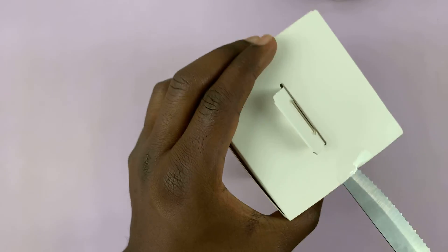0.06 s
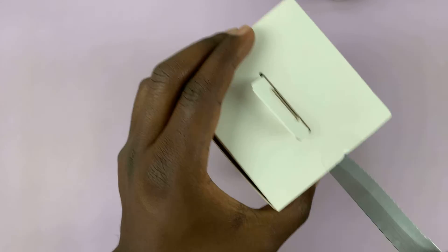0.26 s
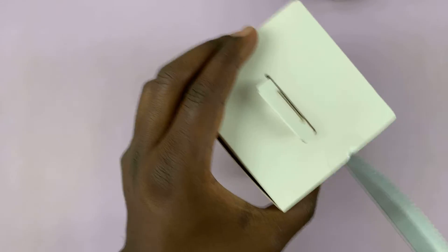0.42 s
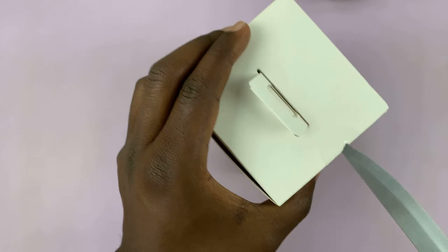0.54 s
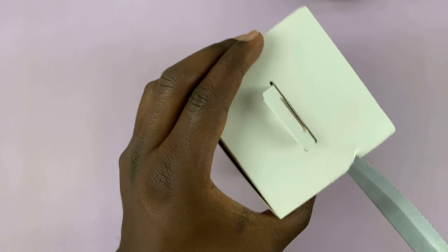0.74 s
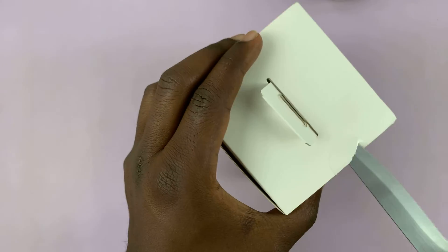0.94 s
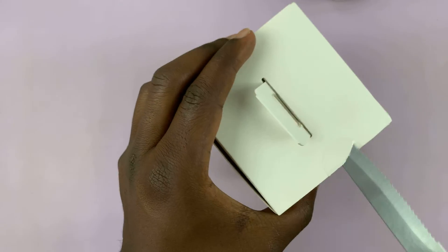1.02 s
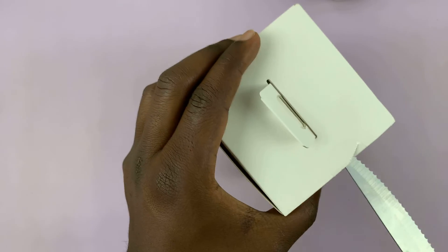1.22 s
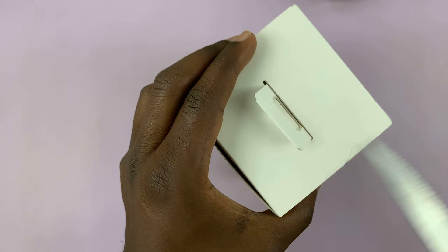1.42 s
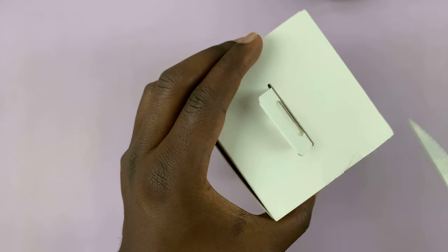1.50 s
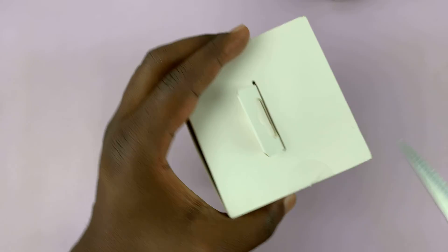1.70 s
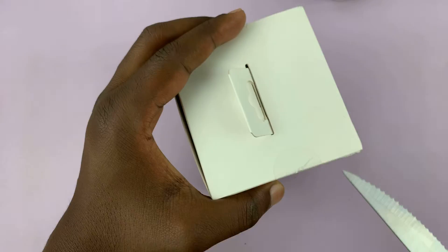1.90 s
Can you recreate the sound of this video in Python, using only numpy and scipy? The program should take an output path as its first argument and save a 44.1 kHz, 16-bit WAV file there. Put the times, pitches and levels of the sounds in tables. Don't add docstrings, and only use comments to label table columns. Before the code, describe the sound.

A serrated knife saws at a seal on a small hollow cardboard box, close to a phone indoors. Light scratches and a small jolt at 0.2 s lead to strong rasping cuts at 0.42-0.54 and 0.6-0.72 s, with crackling fibres, hollow knocks and low table booms. A sharp cut comes near 1.0 s, weaker scrapes at 1.1 and 1.4-1.55 s, then quiet hum and faint bird whistles.

```python
import sys
import numpy as np
from scipy import signal
from scipy.fft import rfft, irfft
from scipy.io import wavfile
from scipy.ndimage import uniform_filter1d

SR = 44100
rng = np.random.default_rng(int(sys.argv[2]) if len(sys.argv) > 2 else 0)


def gain_from_db(level_db):
    decades = np.asarray(level_db, float) / 20
    return 10 ** decades


def generate_wav(signal):
    frames = np.transpose(np.atleast_2d(signal))
    scaled = np.clip(frames, -1, 1) * 32767
    pcm = np.round(scaled).astype(np.int16)
    wavfile.write(sys.argv[1], SR, pcm)


N = 85995


def unit(x):
    return x / np.sqrt(np.mean(x ** 2))


def ring(x, hz, width_hz):
    return signal.lfilter(*signal.iirpeak(hz, hz / width_hz, SR), x)


def body(x, modes):
    total = np.zeros(len(x))
    for k, (hz, width_hz, db) in enumerate(modes):
        total += (-1) ** k * gain_from_db(db) * ring(x, hz, width_hz)
    return total


def colour(x, points):
    f = np.maximum(np.fft.rfftfreq(N, 1 / SR), 1)
    hz, db = np.array(points).T
    below_db = 24 * np.minimum(np.log2(f / hz[0]), 0)
    curve_db = np.interp(np.log(f), np.log(hz), db)
    return irfft(rfft(x) * gain_from_db(curve_db + below_db), N)


def walk(rate_hz):
    hold = max(int(SR / rate_hz), 1)
    steps = np.repeat(rng.standard_normal(N // hold + 1), hold)
    smooth = uniform_filter1d(uniform_filter1d(steps, hold), hold)[:N]
    return smooth / np.std(smooth)


def gate(t, start, length, attack, release):
    rise = np.sin(np.pi / 2 * np.clip((t - start) / max(attack, 1 / SR), 0, 1)) ** 2
    return rise * np.exp(-np.maximum(t - start - length, 0) / release)


def add(out, start, x):
    i = max(int(start * SR), 0)
    out[i:i + len(x)] += x[:N - i]


# f/Hz, level/dB per Hz
ROOM_TONE = [(40, 4), (80, -1.5), (160, -0.5), (300, -11), (700, -20.5), (1500, -23.5), (4000, -31.5),
             (15500, -35)]


def room():
    air = gain_from_db(-63.5 + 0.46 * walk(0.59)) * unit(colour(rng.standard_normal(N), ROOM_TONE))
    hum_level = np.sqrt(2) * gain_from_db(-65.5 + 4.3 * walk(8.54))
    hum_hz = 116.5 + 1.4 * walk(5.92)
    hum = hum_level * np.sin(2 * np.pi * np.cumsum(hum_hz) / SR)
    rumble = gain_from_db(-70) * unit(ring(rng.standard_normal(N), 58, 7.2))
    return air + hum + rumble


# t/s, length/s, f/Hz, level/dB
WHISTLES = [
    (.8, .1, 1630, -81),
    (1.1, .07, 1480, -78),
    (1.19, .16, 1372, -79),
    (1.63, .04, 1480, -82),
    (1.72, .05, 1522, -77),
    (1.825, .075, 1500, -77),
]


def bird(t):
    sag_hz_per_s = 100
    out = np.zeros(N)
    for start, length, hz, db in WHISTLES:
        mean_hz = hz - sag_hz_per_s * (t - start - length) / 2
        whistle = np.sin(2 * np.pi * mean_hz * (t - start))
        out += np.sqrt(2) * gain_from_db(db) * gate(t, start, length, attack=.015, release=.012) * whistle
    return gain_from_db(1.5 * walk(30.2)) * out


# t/s, low boom level/dB, high boom level/dB
TABLE_KNOCKS = [(0, -52.5, -48), (0.059, -54, -51.5), (0.209, -45, -48), (0.341, -49.5, -55),
                (0.429, -40.5, -39), (0.492, -63, -43.5), (0.581, -49, -45), (0.642, -38, -40.5),
                (0.69, -37, -40), (0.782, -49.5, -43), (0.922, -59, -70), (.995, -40, -41),
                (1.091, -68, -47), (1.177, -46, -69), (1.402, -53, -69), (1.539, -49.5, -80)]


def table():
    table_hz, t60_s, rise_s = (50.96, 91.6), (0.71, 0.27), 0.0058
    out, u = np.zeros(N), np.arange(int(.5 * SR)) / SR
    for start, *levels_db in TABLE_KNOCKS:
        for db, hz, t60 in zip(levels_db, table_hz, t60_s):
            fade = gain_from_db(db - 1 - 60 * u / t60) * (1 - np.exp(-u / rise_s))
            add(out, start, fade * np.sin(2 * np.pi * hz * u))
    return out


# f/Hz, width/Hz, level/dB
BOX_MODES = [(159, 33, -3.5), (219, 33, 0), (257, 24, -3.5), (310, 23, 0.5), (360.2, 13, -1), (406, 9.2, 2),
             (501.3, 13.4, -4), (533.4, 37, -3), (602, 67, -13.5), (742, 28, -17), (826, 20.3, -8.5),
             (926, 4.4, -12), (1080, 6, -34), (1316, 11, -9.5)]
# t/s, peak level/dB, wall f/Hz
WALL_JOLTS = [(0.01, -43, 273), (.005, -46.5, 198), (0.019, -45, 330), (0.2106, -33.5, 263),
              (.216, -51, 293), (0.2234, -43, 237), (0.384, -48.5, 427), (0.4293, -35.5, 405),
              (.431, -34.5, 199), (.463, -35, 200), (0.4348, -29.5, 440), (0.4368, -26.5, 380),
              (0.4407, -30.5, 200), (0.4487, -47, 228), (.457, -32, 287), (0.4626, -32, 420),
              (.4685, -55, 437), (.4748, -28.5, 443), (.479, -26.5, 380), (.4918, -24, 440),
              (0.4994, -27, 360), (0.5031, -26, 438), (0.5092, -27, 363), (0.5143, -29.5, 340),
              (0.5237, -36, 362), (.646, -23.5, 322), (0.6547, -34, 384), (.664, -26.5, 310),
              (0.6702, -40, 300), (.6755, -27, 325), (.681, -29.5, 360), (0.6902, -41.5, 326),
              (0.6992, -37, 340), (0.7073, -47, 247), (0.7126, -35.5, 310), (.769, -45, 299),
              (0.949, -49.5, 303), (0.9993, -26.5, 310), (1.0112, -39, 325), (1.014, -41, 304),
              (1.02, -40.5, 277), (1.026, -41, 258), (1.133, -44, 209.8), (1.177, -48.5, 212),
              (1.406, -46, 292), (1.422, -49.5, 254), (1.476, -53, 332), (1.481, -39, 300),
              (1.4858, -43, 375), (1.5233, -38.5, 404), (1.529, -40, 324), (1.551, -51.5, 340)]


def jolts():
    rise_s, fall_s = .0018, .0028
    overtone, overtone_db = 1.444, -15
    out, u = np.zeros(N), np.arange(int(.04 * SR)) / SR - .008
    shape = np.where(u < 0, np.exp(-(u / rise_s) ** 2 / 2), np.exp(-u / fall_s))
    for peak_s, db, hz in WALL_JOLTS:
        swing = -np.cos(2 * np.pi * hz * u)
        swing -= gain_from_db(overtone_db) * np.cos(2 * np.pi * overtone * hz * u)
        add(out, peak_s + u[0], gain_from_db(db) * shape * swing)
    return out + gain_from_db(-10.5) * body(out, BOX_MODES)


# f/Hz, level/dB per Hz
CARD_SPECTRUM = [(410, -49), (700, -3.5), (850, -3), (1500, -6), (2080, -5.5), (3540, -10.5), (4030, -10.5),
                 (12800, -19), (15500, -24.5)]
# t/s, burst peak level/dB, ring f/Hz, ring peak level/dB
FIBRE_SNAPS = [(.015, -42, 3230, -50.5), (.1975, -54, 2080, -52), (.2065, -45, 3500, -54),
               (.2085, -36, 2370, -50), (.4255, -36, 3350, -45), (.432, -43, 8300, -55),
               (.438, -36, 1990, -32), (.446, -50, 2070, -34.5), (.4625, -26, 3430, -31),
               (.466, -57, 7360, -40), (.478, -29, 7230, -37), (.489, -58, 2950, -33.5),
               (.49, -43, 7040, -40), (.47, -47, 826, -24), (.501, -42, 4430, -41), (.597, -43, 4620, -56),
               (0.613, -50, 3360, -41), (.62, -40, 2050, -34), (.639, -34.5, 5280, -34),
               (.6405, -51, 3520, -40), (.643, -46, 2150, -32.5), (.658, -29.5, 2280, -39),
               (.6625, -27.5, 3800, -50), (.675, -29.5, 2250, -41), (.68, -47, 3510, -31),
               (.694, -39, 3300, -38.5), (.701, -41, 3460, -39), (.703, -35.5, 5260, -40.5),
               (.71, -42, 3400, -38), (.97, -43, 3280, -48), (.989, -40, 5000, -36.5),
               (.9935, -27.5, 3580, -30), (.9945, -47, 7600, -33.5), (.9942, -32, 9550, -35.5),
               (1.001, -36, 4300, -37), (1.01, -31.5, 4850, -37), (1.014, -27.5, 3670, -33),
               (1.0953, -35.5, 4670, -42), (1.133, -38.5, 3500, -44.5), (1.155, -39, 9600, -50.5),
               (1.187, -44, 1890, -49.5), (1.404, -38.5, 910, -47), (1.45, -42, 2010, -42),
               (1.4827, -32, 1655, -35.5), (1.483, -39, 1040, -37), (1.484, -36, 7340, -44),
               (1.516, -50, 4280, -48), (1.524, -35, 940, -51), (1.525, -62, 3500, -48)]


def cracks():
    burst_t60_s, ring_t60_s, rise_s = .026, .04, .003
    out, u = np.zeros(N), np.arange(int(.06 * SR)) / SR
    noise = colour(rng.standard_normal(N), CARD_SPECTRUM)
    for k, (start, db, hz, ring_db) in enumerate(FIBRE_SNAPS):
        piece = noise[k * len(u) // 2:][:len(u)]
        brighter = signal.lfilter([1, -0.4], 1, piece)
        burst = unit(brighter) * gain_from_db(db - 60 * u / burst_t60_s)
        width_hz = .16 * hz
        tone = ring(ring(piece[::-1], hz, width_hz), hz, width_hz)[::-1]
        tone = tone / np.std(tone[:len(u) // 6]) * gain_from_db(ring_db - 60 * u / ring_t60_s)
        add(out, start - rise_s / 2, .35 * (burst + tone) * np.minimum(u / rise_s, 1))
    return out


def patchy(x):
    octaves = np.log2(np.maximum(np.fft.rfftfreq(N, 1 / SR), 1) / 700)
    spectrum, out = rfft(x), np.zeros(N)
    for k in range(10):
        share = np.clip(1 - 2 * abs(np.clip(octaves, 0, 4.5) - k / 2), 0, 1)
        out += irfft(spectrum * share, N) * gain_from_db(2 * walk(150))
    return out


# f/Hz, width/Hz, level/dB
BLADE_MODES = [(846.6, 8.9, -31), (2104, 9.3, 3.5), (3560, 110, -23.5), (5470, 185, -6), (7230, 22, -19),
               (7090, 210, -5), (8600, 21, -67.5), (9930, 40, -8.5), (10100, 39, -35), (12300, 770, -12)]
# t/s, length/s, swell/s, scratch level/dB, box drumming level/dB
BLADE_STROKES = [(0, 0.069, 0.00063, -63, -61), (0.073, 0.05, 0.012, -67, -67), (.12, .07, .01, -72, -66),
                 (0.252, 0.094, .01, -73.5, -69), (0.781, 0.044, 0.011, -69, -67.5),
                 (.82, 0.11, .01, -75, -68.5), (1.168, 0.039, .01, -68, -70),
                 (1.212, 0.083, .01, -74.5, -70), (1.542, 0.071, .01, -73, -67),
                 (0.178, 0.026, 0.039, -53.5, -53.5), (0.209, 0.047, 0.01, -74, -58.5),
                 (0.315, 0.082, 0.058, -63, -58.5), (0.4214, 0.043, 0.0055, -48.5, -36.5),
                 (0.447, 0.047, 0.01, -44.5, -45), (0.496, 0.042, 0.0059, -55, -60),
                 (0.562, 0.07, 0.088, -48.5, -50.5), (.634, 0.047, 0.0035, -48.5, -47.5),
                 (0.692, 0.02, 0.0097, -51, -50.5), (0.718, 0.079, 0.022, -60.5, -63),
                 (0.876, 0.2, 0.1, -63, -62.5), (0.981, 0.031, 0.011, -53, -51.5),
                 (1.007, 0.042, 0.004, -63, -63), (1.097, 0.087, 0.0038, -60, -58),
                 (1.363, 0.072, 0.044, -61, -60), (1.441, 0.083, 0.013, -58.5, -54.5),
                 (1.473, 0.032, 0.002, -53.5, -55), (1.511, 0.042, 0.006, -64.5, -56.5),
                 (1.596, 0.073, 0.05, -69.5, -69)]


def stroke_force(t, column, release_s):
    power = np.zeros(N)
    for stroke in BLADE_STROKES:
        power += (gain_from_db(stroke[column]) * gate(t, *stroke[:3], release_s)) ** 2
    return np.sqrt(power)


def scrape(t):
    grains_per_s, scatter_db, biggest_grain = 20000, 2, 2.5
    size_db = scatter_db * np.minimum(rng.exponential(size=N), biggest_grain)
    size = gain_from_db(size_db) * rng.standard_normal(N)
    hits = rng.random(N) < grains_per_s / SR
    grains = size * hits * gain_from_db(1.6 * walk(300))

    force = stroke_force(t, 3, release_s=0.015)
    card = force * unit(patchy(colour(grains, CARD_SPECTRUM)))
    blade = body(grains * force, BLADE_MODES) / np.std(body(grains, BLADE_MODES))
    drum_force = stroke_force(t, 4, release_s=0.02)
    drum = body(grains * drum_force, BOX_MODES) / np.std(body(grains, BOX_MODES))
    return card + gain_from_db(-8) * blade + drum


def scene():
    t = np.arange(N) / SR
    near = scrape(t) + cracks() + jolts() + table()
    u = t[:int(.5 * SR)]
    echo_t60_s, echo_top_hz = 0.37, 5000
    tail = signal.lfilter(*signal.butter(1, echo_top_hz, fs=SR), rng.standard_normal(len(u)))
    tail = tail * gain_from_db(-60 * u / echo_t60_s) * (u > .004)
    echo = signal.fftconvolve(near, tail / np.sqrt(np.sum(tail ** 2)))[:N]
    return (near + gain_from_db(-16) * echo + bird(t) + room())[None]


def top_cut(x):
    return signal.sosfilt(signal.butter(12, 15740, fs=SR, output="sos"), x)


def record(dry):
    x = signal.sosfilt(signal.butter(2, 32, "high", fs=SR, output="sos"), dry)
    x = signal.sosfilt(signal.ellip(10, .2, 70, 15550, fs=SR, output="sos"), x)
    return top_cut(x)


dry = scene()
out = record(dry)
generate_wav(out)
```